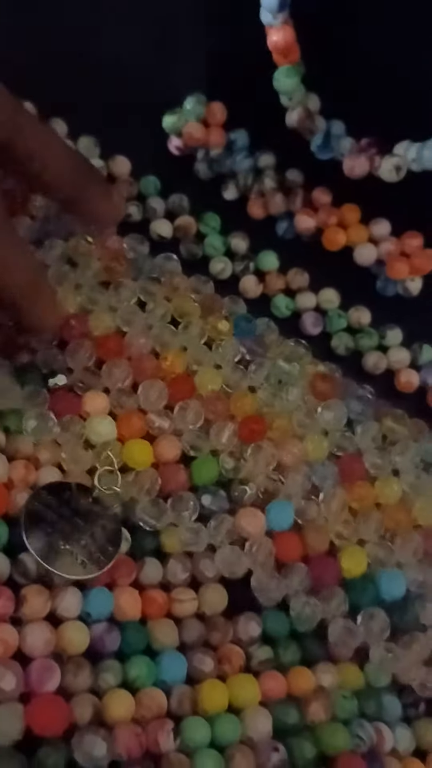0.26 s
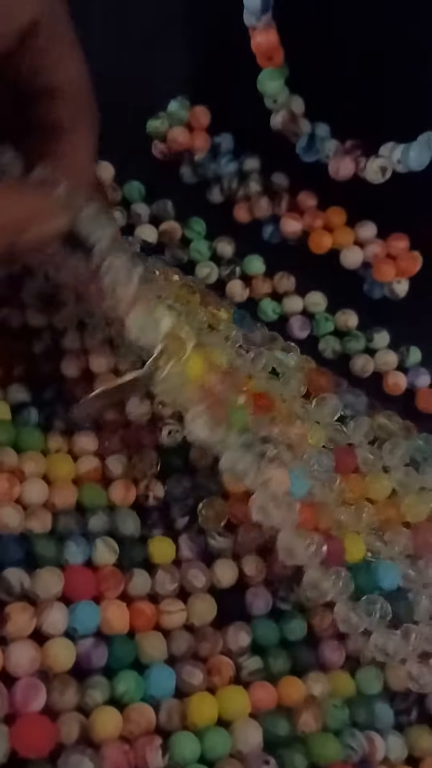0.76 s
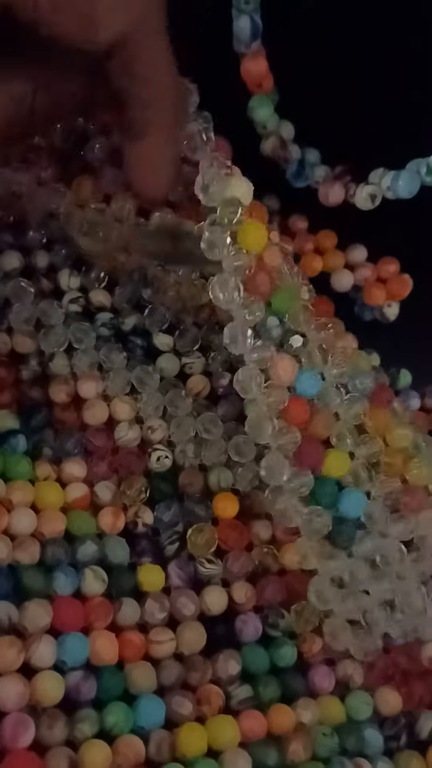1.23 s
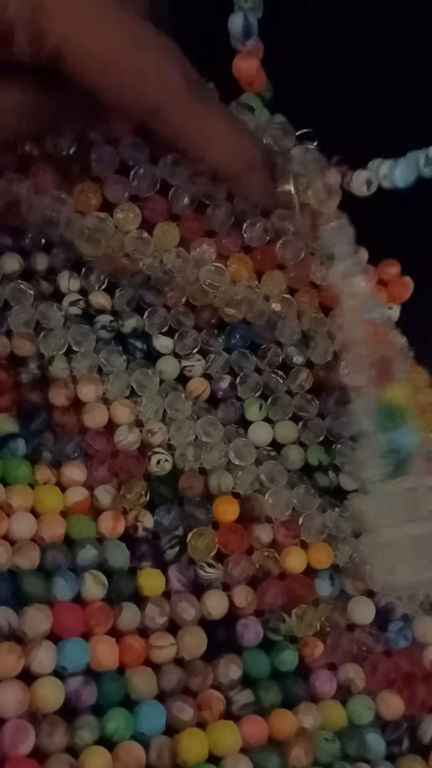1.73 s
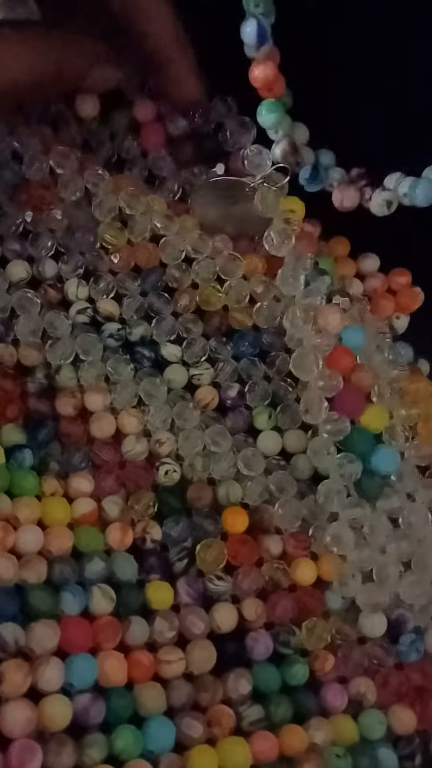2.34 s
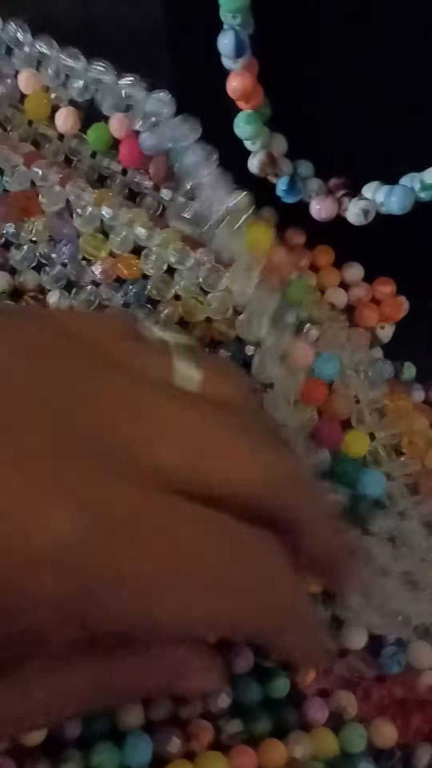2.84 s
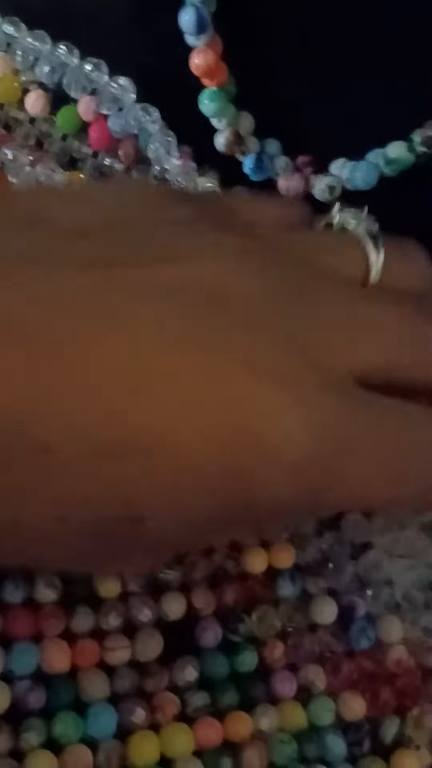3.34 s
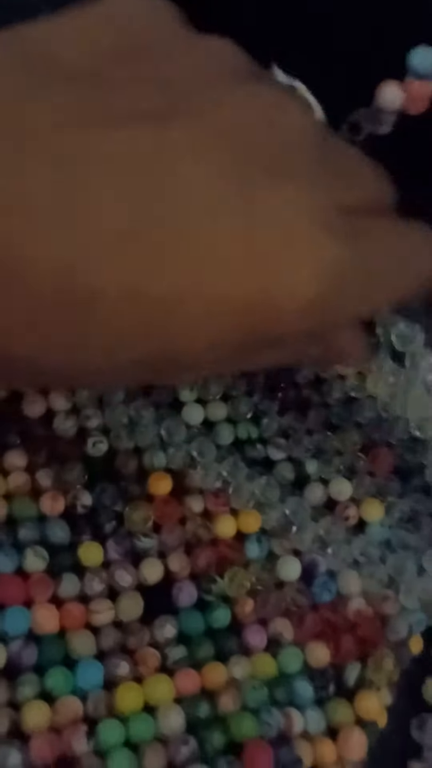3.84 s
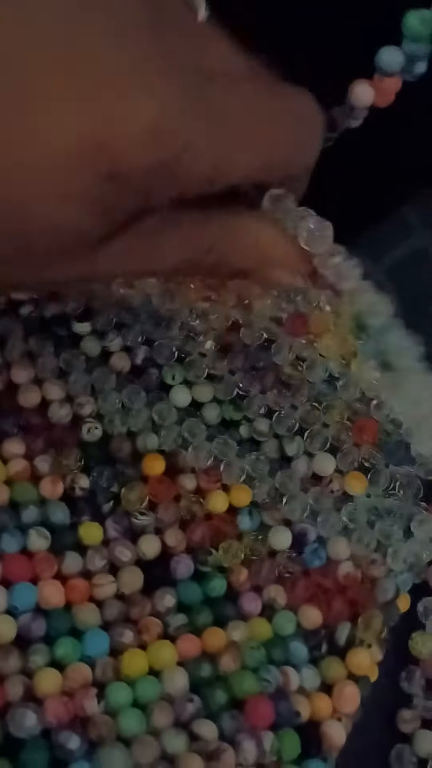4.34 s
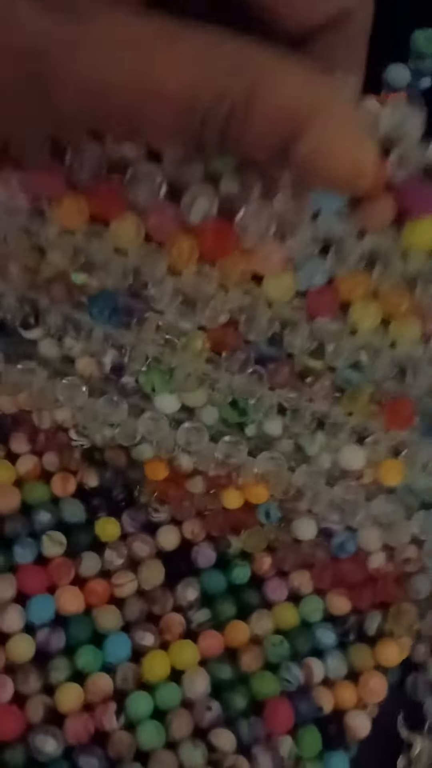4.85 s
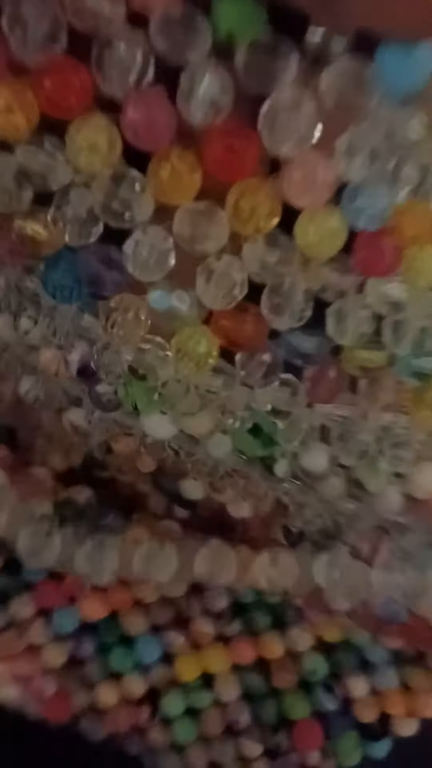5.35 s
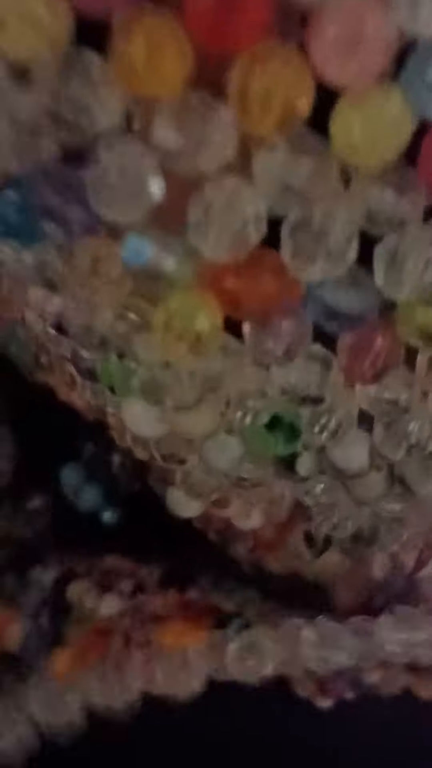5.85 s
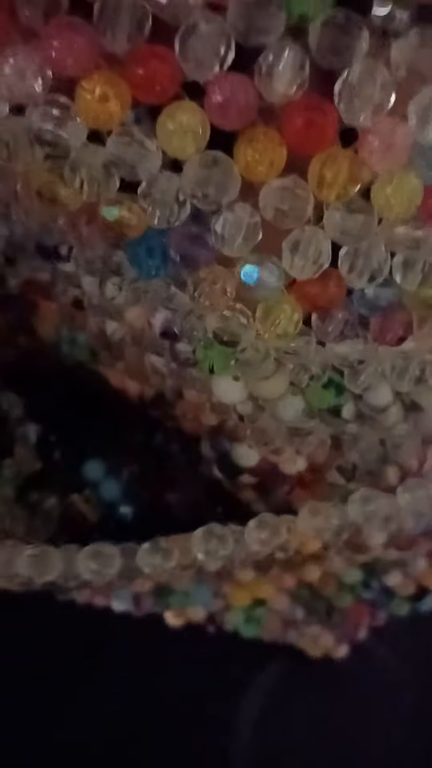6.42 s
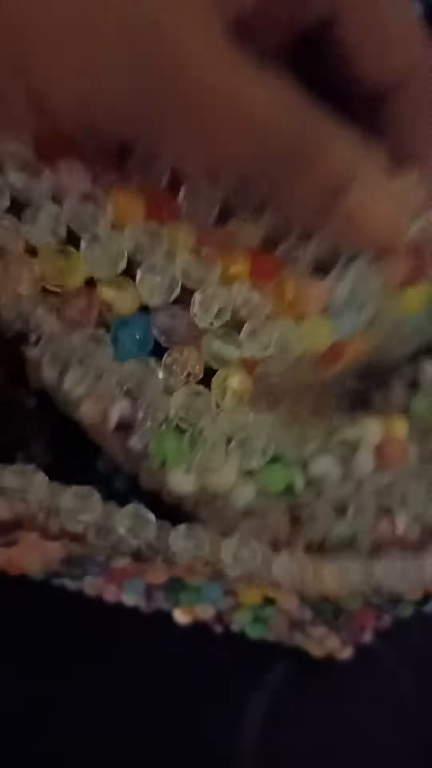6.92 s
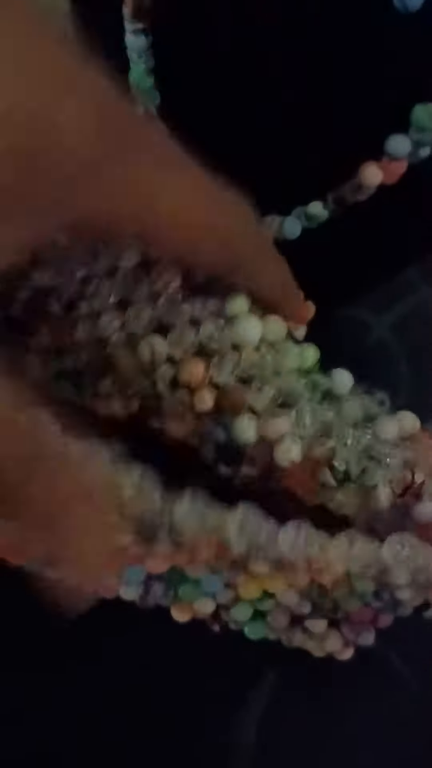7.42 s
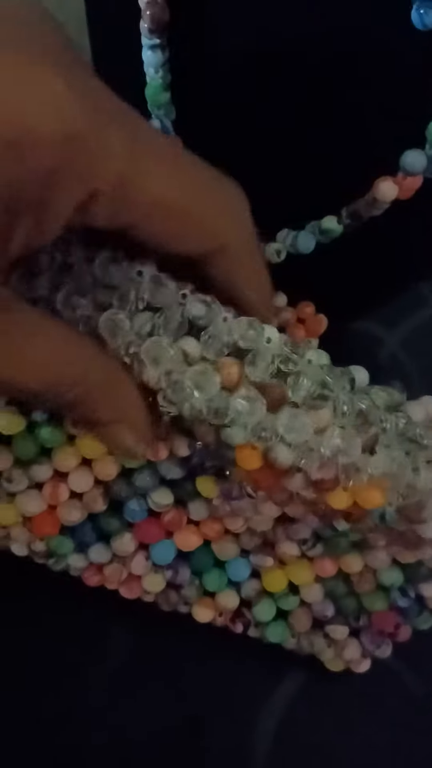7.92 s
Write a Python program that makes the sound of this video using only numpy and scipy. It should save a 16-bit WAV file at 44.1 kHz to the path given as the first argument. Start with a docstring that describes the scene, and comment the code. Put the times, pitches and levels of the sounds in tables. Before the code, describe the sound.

Plastic beads tick and clack as a hand works a beaded bag on bedding, a long rustling drag, then a sharp rattling drop.

```python
"""In a quiet room a hand opens a bag of strung plastic beads on a bed, a phone held close above it.
First come bead ticks, clicks and knocks over soft bedding booms; a small metal clasp rings as filtered
blows of high sine modes. From 4.5 s the bag is dragged in a long rustle of random noise contacts,
resonating in its folds. Near 7.3 s it drops: thumps drive the bedding modes and the clasp rings loudest,
then the beads rattle out."""
import sys
import numpy as np
from scipy import signal
from scipy.fft import rfft, irfft
from scipy.io import wavfile
from scipy.ndimage import uniform_filter1d

SR = 44100
rng = np.random.default_rng(int(sys.argv[2]) if len(sys.argv) > 2 else 0)


def generate_wav(sig):
    """Save sig (samples, or channels by samples) to the path in sys.argv[1] as 16-bit PCM at SR."""
    pcm = np.round(np.clip(np.atleast_2d(sig).T, -1, 1) * 32767).astype(np.int16)
    wavfile.write(sys.argv[1], SR, pcm)


N = 360738
TIME = np.arange(N) / SR
PORT_LAG = 4  # samples by which the right port hears the bag late


def undb(db):
    """Turn dB into an amplitude factor."""
    return 10 ** (np.asarray(db) / 20)


def together(*db):
    """Level in dB of sounds whose powers add."""
    return 10 * np.log10(sum(undb(d) ** 2 for d in db))


def unit(x):
    """Scale to rms 1."""
    return x / np.sqrt(np.mean(x ** 2))


def colour(x, spectrum):
    """Causal filter through (Hz, dB) points, made from the cepstrum of the log gain."""
    hz, db = np.transpose(spectrum)
    grid = np.maximum(np.arange(513) * SR / 1024, 1)
    cepstrum = irfft(np.log(undb(np.interp(np.log(grid), np.log(hz), db))))
    # fold the second half onto the first: minimum phase
    cepstrum[1:512] *= 2
    cepstrum[513:] = 0
    impulse = irfft(np.exp(rfft(cepstrum)))
    return signal.oaconvolve(x, impulse[None], axes=1)[:, :N]


def band(x, lo_hz, hi_hz):
    """Keep the range between two frequencies."""
    return signal.sosfilt(signal.butter(2, [lo_hz, hi_hz], "band", fs=SR, output="sos"), x)


def ring(x, modes):
    """Drive resonances (Hz, width in Hz, dB), neighbours of opposite sign."""
    return sum((-1) ** k * undb(db) * signal.lfilter(*signal.iirpeak(hz, hz / width, SR), x)
               for k, (hz, width, db) in enumerate(modes))


def decay(x, t60):
    """Let every impulse die by 60 dB in t60 seconds."""
    return signal.lfilter([1], [1, -1000. ** (-1 / (t60 * SR))], x)


def walk(rate):
    """Random levels held 1 / rate s and slewed; rms 1."""
    hold = int(SR / rate)
    steps = np.repeat(rng.standard_normal(N // hold + 1), hold)
    return unit(uniform_filter1d(steps, hold)[:N])


def pair(alike):
    """Noise for the two microphone ports with the given likeness."""
    mid, side = rng.standard_normal((2, N))
    alike = np.clip(alike, 0, 1)
    return np.sqrt((1 + alike) / 2) * mid + np.sqrt((1 - alike) / 2) * side * np.array([[1], [-1]])


def grains(per_s, spread_db, t60, alike):
    """Random contacts of uneven strength, each a dying burst; mean power does not follow the rate."""
    chance = rng.random((2, N))
    strength = undb(-spread_db * np.log(1 - chance[1])) / np.sqrt(per_s)
    hits = (chance[0] < per_s / SR) * strength
    return decay(hits, t60) * pair(alike)


def late(x):
    """Delay the right port."""
    return np.array([x[0], np.roll(x[1], PORT_LAG)])


def add(out, s, sound):
    """Mix a short sound in at time s."""
    i = int(s * SR)
    out[:, i:i + sound.shape[1]] += sound[:, :N - i]


# Slow handling of the bag. Each row: time in seconds, then control levels in dB of the deep boom,
# the hum of the first upper bedding mode, the steady rustle and the steady ticks.
HANDLING_LEVELS = [(0, -49.5, -51, -66.5, -64.5), (.5, -52.5, -53.5, -89.5, -90.5),
                   (1.02, -45, -55.5, -67.5, -74), (1.42, -51.5, -61, -89.5, -99),
                   (1.95, -58, -68, -63.5, -90), (2.25, -52.5, -61, -54, -85),
                   (2.47, -66, -61.5, -67.5, -100), (2.6, -67.5, -71, -103, -105),
                   (3.3, -65.5, -66.5, -69, -82), (4.12, -60, -70, -71, -87),
                   (4.85, -49.5, -50, -54, -81.5), (5.6, -49, -55, -79, -112), (5.8, -62, -65.5, -61, -53),
                   (6.099, -45, -57, -59.5, -63), (6.301, -51.5, -44, -49.5, -58),
                   (6.45, -64, -61, -64, -96), (6.75, -50, -63.5, -90.5, -69), (7.27, -54, -57, -59, -61.5),
                   (7.45, -56, -38, -50, -47), (7.62, -67.5, -46.5, -63, -55), (7.77, -56, -63, -75, -75),
                   (7.83, -72, -61, -56.5, -67), (8.14, -60.5, -53.5, -68.5, -79)]
# Short moves of the bag. Each row: peak in seconds, time to fade 20 dB in seconds (0.01 at least),
# control levels in dB of rustle and ticks.
BAG_MOVES = [(0.178, 0.04, -52, -61), (0.219, -0.78, -49.5, -76), (0.34, -0.09, -49.5, -75),
             (0.875, 0.3, -57.5, -72.5), (1.075, 0.5, -64, -68), (1.185, 0.19, -53, -63),
             (1.555, 0.15, -56.5, -74.5), (1.715, 0.15, -51, -61), (2.104, 0.35, -54, -59),
             (2.32, -0.08, -61.5, -58), (2.439, 0.04, -47, -64), (2.861, 0.11, -48.5, -64),
             (3.223, 0.55, -57, -75), (3.46, 0.1656, -45, -59.5), (3.503, 0.02, -42, -70),
             (3.79, 1.5, -62, -68), (3.948, -0.22, -59, -63.5), (4.24, -0.46, -58, -72),
             (5.69, 0, -76.5, -38.5), (5.903, 0.2938, -45.5, -47), (5.959, -0.02, -50.5, -41.5),
             (6.02, 0.03, -51, -73), (6.333, -0.16, -58, -53.5), (6.541, 0.13, -59.5, -58.5),
             (6.816, 2, -59.5, -68), (7.087, 0.2, -49.5, -48), (7.348, 0.62, -43, -46),
             (7.546, 0.55, -47.5, -53), (7.734, -0.28, -51, -53), (7.876, 0.13, -59, -57.5),
             (8.07, 0.04, -44, -54.5)]
# The long drag across the bed. Each row: time in seconds, control levels in dB of rustle and ticks.
LONG_DRAG = [(4.46, -80, -79), (4.503, -50.5, -82), (4.758, -62.5, -63), (4.821, -47.5, -59.5),
             (4.932, -45.5, -66.5), (5.119, -43.5, -57.5), (5.151, -49, -74), (5.223, -44, -51),
             (5.292, -40, -63.5), (5.424, -39, -51.5), (5.754, -51.5, -57), (5.84, -68, -76)]
RISE_DB_PER_S = 432  # how fast a move sets in
MOVE_BOOM_DB, MOVE_HUM_DB = -4, 1.5  # bedding control level relative to a move's rustle


def controls():
    """Ride boom, hum, rustle and ticks in dB: slow handling, long drag and every short move add power."""
    t = TIME[::64]
    s, *columns = np.transpose(HANDLING_LEVELS)
    boom, hum, rustle, ticks = (np.interp(t, s, c) for c in columns)
    peak, fade, rustle_db, ticks_db = np.transpose(BAG_MOVES)[:, :, None]
    shape = -np.maximum(RISE_DB_PER_S * (peak - t), 20 * (t - peak) / np.maximum(fade, .01))
    moved = together(*(rustle_db + shape))
    shaken = together(*(ticks_db + shape))
    s, *columns = np.transpose(LONG_DRAG)
    dragged, rolled = (np.interp(t, s, c, -120, -120) for c in columns)
    levels = (together(boom, moved + MOVE_BOOM_DB),
              together(hum, moved + MOVE_HUM_DB),
              together(rustle, moved, dragged),
              together(ticks, shaken, rolled))
    return [np.interp(TIME, t, level) for level in levels]


# Tone of the room and hiss. Each row: frequency in Hz, relative density in dB per Hz.
ROOM_TONE = [(18, -38), (30, -9.5), (91, -2), (217, 3), (640, -31.5), (2050, -41.5), (3200, -49.5),
             (5500, -47.5), (7000, -32.5), (12600, -39.5), (15200, -46.5), (16400, -62)]
# Faint narrow bands of hiss. Each row: centre in Hz, width in Hz, relative level in dB.
HISS_BANDS = [(1620, 120, -1.5), (2450, 44, -4), (4460, 280, -9.5)]
# Fader of those bands. Each row: time in seconds, level in dB.
HISS_FADER = [(.2, -81.5), (.55, -92.5), (.85, -78.5), (1.15, -82), (1.4, -104.5), (2.0, -79), (2.8, -82.5),
              (3.7, -74.5), (4.05, -93)]


def air():
    """Quiet room tone, alike at both ports below 500 Hz, microphone hiss and bands that come and go."""
    low = signal.sosfilt(signal.butter(2, 500, fs=SR, output="sos"), pair(0.58))
    high = signal.sosfilt(signal.butter(2, 500, "high", fs=SR, output="sos"), pair(0.043))
    tone = unit(colour(low + high, ROOM_TONE)) * undb(-64.5)
    bands = sum(undb(db) * unit(ring(pair(0.15), [(hz, width, 0)])) for hz, width, db in HISS_BANDS)
    return tone + bands * undb(np.interp(TIME, *np.transpose(HISS_FADER)))


# Deep modes of the bedding. Each row: frequency in Hz, width in Hz, relative level in dB.
BED_LOW_MODES = [(50.4, 7.9, -1.5), (85.3, 7.9, 3), (113, 7.1, 2), (142, 54, -4.5)]
# Upper modes of the bedding. Each row: frequency in Hz, width in Hz, relative level in dB.
BED_UPPER_MODES = [(216.5, 12.6, 1.5), (310.2, 36.4, -1), (464, 10, -10.5)]


def bedding(boom_db, hum_db, rustle_db):
    """The mattress booms as it is pressed; the dragged bag wakes its upper modes by random contacts."""
    boom = unit(ring(ring(pair(0.99), BED_LOW_MODES), [(84, 135, 0)]))
    boom *= undb(boom_db + 2.5 + 1.9 * walk(15))
    hum = unit(ring(grains(600, 0.5, 0.03, 0.74), BED_UPPER_MODES[:1]))
    hum *= undb(hum_db + 1.31 * walk(25))
    slide = undb(0.91 * (rustle_db + 49) - 53.5)
    contacts = unit(grains(500, 0.35, 0.012, 0.98)) * slide
    scrape = ring(contacts, BED_UPPER_MODES[1:]) * undb(28)
    return boom + hum + scrape


# Tone of the rustle. Each row: frequency in Hz, relative density in dB per Hz.
RUSTLE_TONE = [(250, -29.5), (430, 1), (680, -7.5), (1020, -4.5), (2550, -9.5), (2850, -18), (5000, -20),
               (8000, -30.5)]
# Folds of the beaded wall. Each row: frequency in Hz, width in Hz, relative level in dB.
WALL_FOLDS = [(842, 55, 6.5), (1038, 76, 5.5), (1344, 160, 0), (1986, 36, -15.5), (2390, 400, -4.5)]


def sliding(db):
    """Dull dragging contacts and sparser clacks in wavering folds; harder moves are denser, brighter."""
    per_s = np.clip(350 * undb(0.65 * (db + 56)), 80, 2000)
    drag = unit(colour(late(grains(per_s, 1.7, 0.024, 0.46)), RUSTLE_TONE))
    dull = signal.sosfilt(signal.butter(2, 1900, fs=SR, output="sos"), drag)
    brightness = np.minimum(undb(0.49 * (db + 44.5)), 1.1)
    folds = np.zeros((2, N))
    for fold in WALL_FOLDS:
        clacks = late(grains(per_s / 2.2, 2.16, 0.012, 0.3))
        folds += ring(clacks, [fold]) * undb(4.5 * walk(11))
    rustle = dull + (drag - dull) * brightness + undb(-5.5) * unit(folds)
    return rustle * undb(db - 3.5 + 0.8 * walk(25))


# Tone of the ticks. Each row: frequency in Hz, relative density in dB per Hz.
TICK_TONE = [(1800, -40), (3600, -3), (4360, 1.5), (12200, 1), (15300, -5), (16400, -23)]


def swarm(db):
    """Small bead ticks; larger and smaller beads sound in their own range and at their own moments."""
    per_s = np.clip(150 * undb(0.61 * (db + 67)), 30, 800)
    ranges_hz = ((3200, 5150), (5000, 22000), (8000, 22000))
    ticks = sum(band(grains(per_s, 3.25, 0.011, 0.045), lo_hz, hi_hz) for lo_hz, hi_hz in ranges_hz)
    tilt_db = np.array([[-1.2], [1.2]])  # left, right
    return unit(colour(ticks, TICK_TONE)) * undb(db + 0.5 + 3.16 * walk(28) + tilt_db)


# Single bead clicks. Each row: start in seconds, relative peak in dB, centre in Hz.
BEAD_CLICKS = [(0.111, -41.5, 10500), (0.3247, -47, 4500), (0.338, -37.5, 5240), (0.55, -34, 10700),
               (0.609, -35, 10400), (0.726, -53, 5960), (0.851, -50, 10100), (1.0637, -48.5, 7240),
               (1.1288, -47, 6260), (1.1515, -38, 12700), (1.1723, -36.5, 4630), (1.195, -40.5, 9000),
               (1.5217, -45, 10400), (1.7186, -27, 10300), (1.812, -49, 8550), (2.1092, -29.5, 11300),
               (2.1327, -37.5, 5330), (2.2285, -38, 9970), (2.2342, -33.5, 5940), (2.321, -35.5, 11300),
               (2.43, -37, 4540), (2.831, -36.5, 10950), (2.874, -40, 8600), (3.239, -48, 5950),
               (3.386, -46, 4830), (3.923, -41, 12100), (3.955, -41.5, 11500), (4.183, -52.5, 11500),
               (4.217, -42.5, 13000), (5.0834, -39, 4000), (5.567, -32.5, 11700), (5.671, -28, 11600),
               (5.903, -51, 11400), (5.957, -26.5, 12000), (5.982, -28, 9800), (6.0497, -34.5, 11300),
               (6.079, -47.5, 11900), (6.107, -32, 10900), (6.307, -47, 12000), (6.347, -32, 9000),
               (6.526, -40.5, 6200), (7.0327, -37, 8950), (7.056, -29, 11200), (7.135, -35, 7050),
               (7.196, -33, 12300), (7.233, -37, 12000), (7.317, -16.5, 11200), (7.353, -24, 12200),
               (7.381, -24.5, 12300), (7.499, -32, 11740), (7.5153, -27.5, 11700), (7.582, -29, 11500),
               (7.6273, -29, 10200), (8.162, -40.5, 4530)]


def clicks():
    """A sharp noise crack around each contact's own pitch, then a fainter chatter of the neighbours."""
    out, t = np.zeros((2, N)), TIME[:SR // 10]
    attack = 1 - np.exp(-t / 0.0001)
    shape = (undb(10.5) * 1000. ** (-t / 0.0015) + 1000. ** (-t / 0.024)) * attack
    tilt_db = np.array([[-1.2], [1.2]])  # left, right
    for s, db, hz in BEAD_CLICKS:
        burst = rng.standard_normal((2, len(t))) * shape
        crack = band(burst, .5 * hz, min(2.03 * hz, 17000))
        chatter = undb(-20) * band(burst, 990, 17000)
        add(out, s, (crack + chatter) * undb(db - 3.5 + tilt_db))
    return out


# Dull knocks of the beaded wall. Each row: start in seconds, relative peak in dB, pitch in Hz.
WALL_KNOCKS = [(0.325, -41.5, 1060), (0.871, -46.5, 1180), (0.913, -47.5, 1040), (1.07, -46.5, 1480),
               (1.173, -45, 1170), (1.199, -45, 1120), (1.239, -48, 1300), (1.548, -45.5, 1410),
               (2.24, -35, 766), (2.436, -34, 730), (2.831, -45, 2400), (2.842, -42, 877),
               (3.213, -46.5, 1220), (3.385, -48.5, 1285), (3.442, -35.5, 684), (3.777, -44, 1480),
               (3.849, -45, 960), (3.883, -49.5, 1230), (3.94, -38.5, 1114), (4.059, -50.5, 1030),
               (5.931, -34.5, 1094), (6.007, -34.5, 596), (6.249, -51, 1320), (6.272, -30.5, 1315),
               (7.085, -33.5, 1460), (7.103, -29.5, 1127), (7.28, -37.5, 530), (7.334, -19.5, 1420),
               (7.358, -34, 1110), (7.388, -43, 1340), (7.407, -23, 1067), (7.453, -28.5, 2230),
               (7.465, -24, 985), (7.531, -28.5, 1060), (7.583, -30, 1100), (7.601, -36.5, 1190),
               (7.668, -41, 1530), (7.72, -36, 2070), (7.797, -48, 960), (7.886, -44, 1040),
               (7.986, -41, 780), (8.055, -45, 1260)]


def knocks():
    """The beaded wall rings briefly at the pitch of the struck fold, over a short noise rattle."""
    out, t = np.zeros((2, N)), TIME[:SR // 10]
    for s, db, hz in WALL_KNOCKS:
        noise = rng.standard_normal((3, len(t)))
        burst = (noise[0] + 0.77 * noise[1:]) * 1000. ** (-t / 0.039)  # shared plus each port's own
        rattle = band(band(burst, 290, 2500), 260, 3050)
        tone = np.sin(2 * np.pi * hz * t) * 1000. ** (-t / 0.043)
        add(out, s, late(undb(db - 6.5) * tone + undb(db + 0.5) * rattle))
    return out


def blows(times, db):
    """Soft 2.7 ms pushes, stronger at the left port."""
    out = np.zeros((2, N))
    out[:, (times * SR).astype(int)] = undb(db + np.array([[1.2], [-1.2]]))
    return signal.oaconvolve(out, np.hanning(int(0.0027 * SR))[None], axes=1)[:, :N]


# The bag thumps the bedding. Each row: start in seconds, relative peak in dB,
# upper modes above the first in dB relative to that peak.
BAG_THUMPS = [(0.33, -32.5, 2), (1.719, -32, -17.5), (2.428, -28, -7.5), (3.432, -34.5, 2),
              (4.282, -37.5, -12.5), (5.975, -26, -4.5), (6.274, -25, -29), (7.097, -29, -9),
              (7.332, -9, -0.5), (7.357, -16.5, 0), (7.408, -12.5, -6.5), (7.456, -18, 1.5),
              (7.552, -27, 0.5), (8.161, -30, -2.5)]
# Dead first swing of a thump. Each row: frequency in Hz, width in Hz, relative level in dB.
THUMP_SWING = [(304, 140, 6.5)]


def thumps():
    """Each landing pushes the bedding: a dead first swing, then its deep and upper modes ring."""
    s, db, above_db = np.transpose(BAG_THUMPS)
    swing = ring(blows(s, db), THUMP_SWING)
    deep = ring(blows(s, db + 4.5), BED_LOW_MODES[2:])
    first = ring(blows(s, db + 9), BED_UPPER_MODES[:1])
    above = ring(blows(s, db + above_db + 17), BED_UPPER_MODES[1:])
    return swing + deep + first - above


# The clasp is struck. Each row: start in seconds, relative peak in dB, left minus right in dB,
# ring length as a share of the free ring.
CLASP_BLOWS = [(0.5496, -22, -3, 0.37), (0.6103, -32.5, 3, 0.28), (1.718, -44, -15, 0.47),
               (1.811, -47, -11, 0.48), (2.11, -33, -10, 0.56), (3.839, -56, -10, .3),
               (3.922, -37, -11.5, 0.46), (3.9383, -29, -11, 0.21), (4.06, -49, -11, 0.18),
               (4.785, -48.5, -12, .5), (7.08, -41.5, -4, 0.86), (7.169, -39.5, -12, 0.72),
               (7.318, -16, -3, 0.9), (7.337, -14, -14, 0.51), (7.3515, -12.5, -1, 1.4),
               (7.3792, -7, -4.5, 0.65), (7.474, -29, 0, 0.64), (7.534, -28.5, 1, 0.51)]
# Modes of the clasp. Each row: ratio to the main mode, relative level in dB,
# free ring time to -60 dB in seconds.
CLASP_MODES = [(1, 0, .11), (1.005, -11, .07), (.978, -14, .03), (.615, -27, .08)]
LOOSE_HZ, HELD_HZ, HELD_S = 12810, 12925, (3.8, 4.1)  # main mode loose, and while the hand lies on it


def clasp(ticks):
    """Thin metal: high modes woken unevenly, shaken and cut short by touching beads; ticks whisper in it."""
    out, t = np.zeros((2, N)), TIME[:SR // 5]
    attack = 1 - np.exp(-t / 0.00051)
    for s, db, pan_db, free in CLASP_BLOWS:
        main_hz = HELD_HZ if HELD_S[0] < s < HELD_S[1] else LOOSE_HZ
        for ratio, mode_db, t60 in CLASP_MODES:
            size, turn = rng.standard_normal(2)
            port_phase = np.array([[0], [1.3 + 0.47 * turn]])
            tone = np.sin(2 * np.pi * main_hz * ratio * t + port_phase)
            gain = undb(db + mode_db + 1.9 * size + np.array([[pan_db], [-pan_db]]) / 2)
            add(out, s, gain * tone * 1000. ** (-t / (t60 * max(free, .1))) * attack)
    whisper = ring(ticks, [(LOOSE_HZ, 60, 3)])
    return out * undb(2.5 * walk(35)) + whisper


def room(x):
    """A short diffuse noise tail, unrelated left and right, starting after 3 ms."""
    t = TIME[:SR // 3]
    tail = rng.standard_normal((2, len(t))) * 1000. ** (-t / 0.077) * (t > .003)
    tail /= np.sqrt(np.sum(tail ** 2) / 2)
    return signal.oaconvolve(x, tail, axes=1)[:, :N] * undb(-8)


def scene():
    """Mix the bag with its room tail, the bedding slightly to the left, and the air."""
    boom_db, hum_db, rustle_db, ticks_db = controls()
    ticks = swarm(ticks_db)
    bag = sliding(rustle_db) + ticks + clicks() + knocks() + clasp(ticks)
    bed = bedding(boom_db, hum_db, rustle_db) + thumps()
    return bag + room(bag) + bed * undb([[.8], [-.8]]) + air()


def record(dry):
    """The phone drops the deepest bass, rounds the loudest peaks and cuts the top."""
    dry = signal.sosfilt(signal.butter(5, 44, "high", fs=SR, output="sos"), dry)
    rounded = np.tanh(dry)
    return signal.sosfilt(signal.ellip(8, .2, 70, 15900, fs=SR, output="sos"), rounded)


dry = scene()
out = record(dry)
generate_wav(out)
```